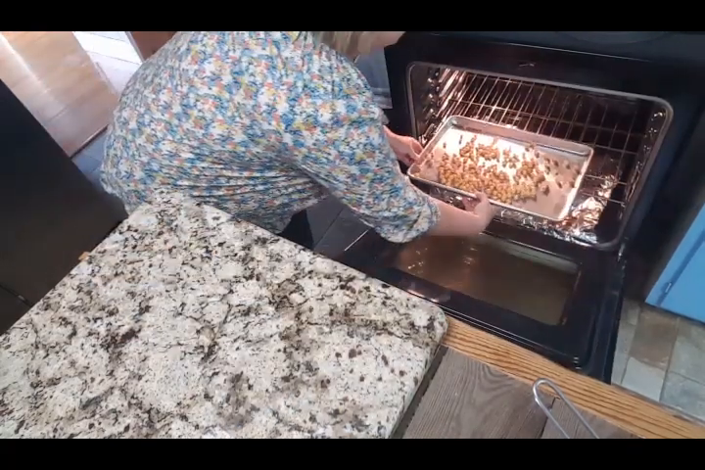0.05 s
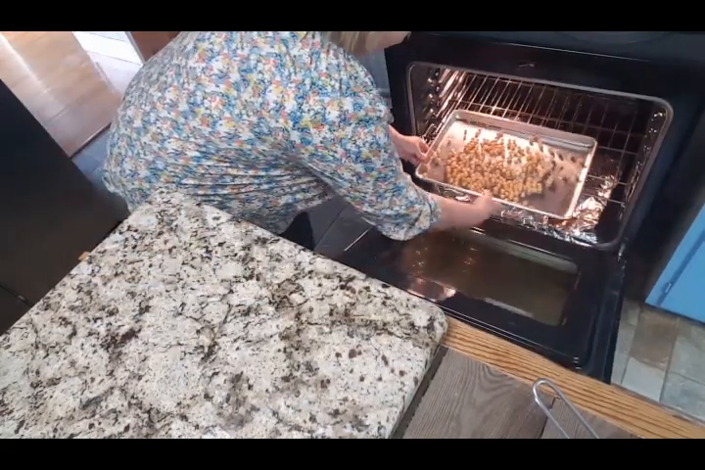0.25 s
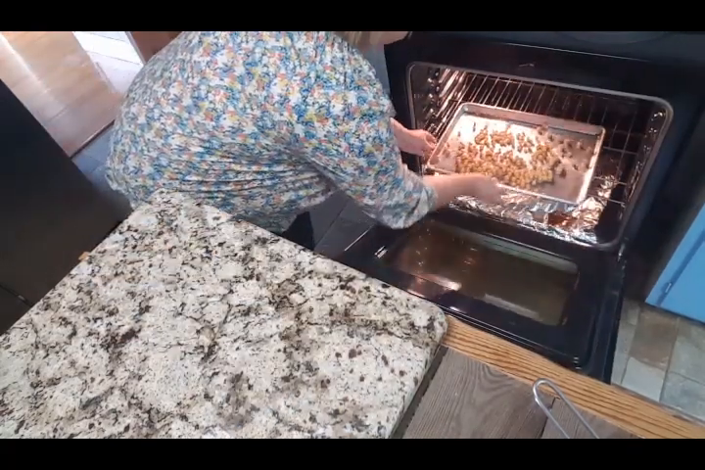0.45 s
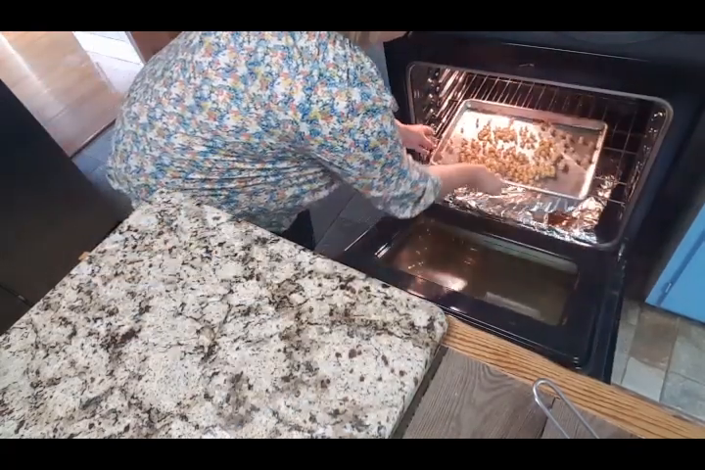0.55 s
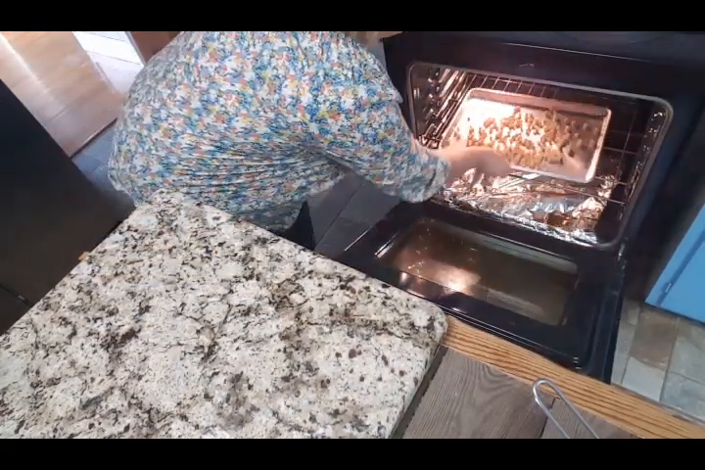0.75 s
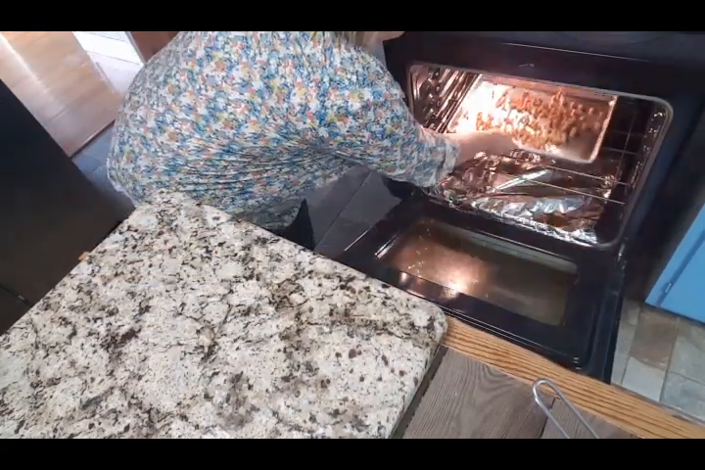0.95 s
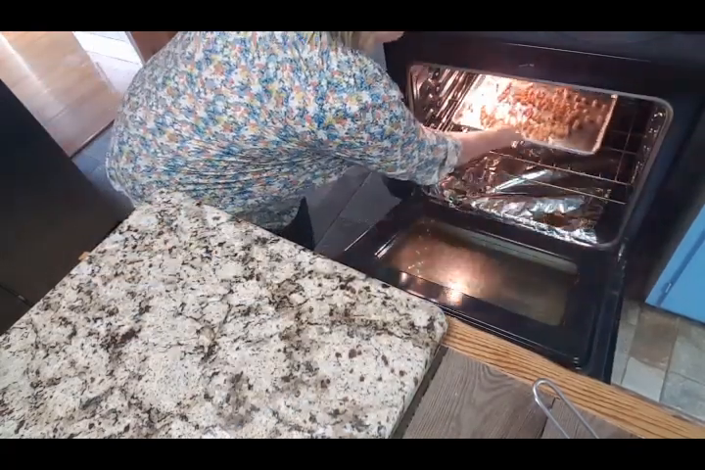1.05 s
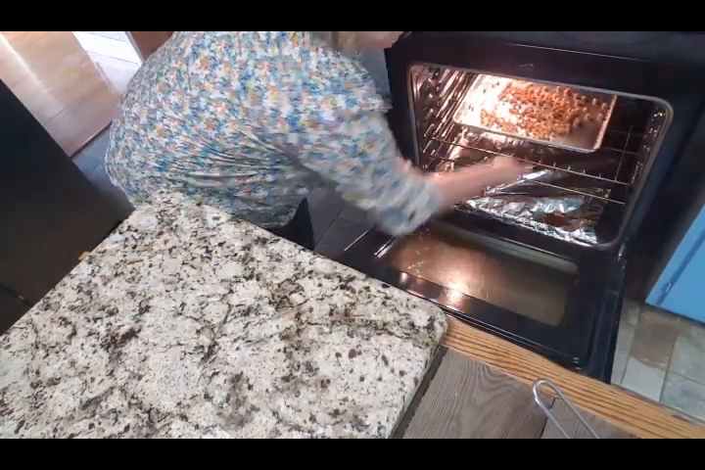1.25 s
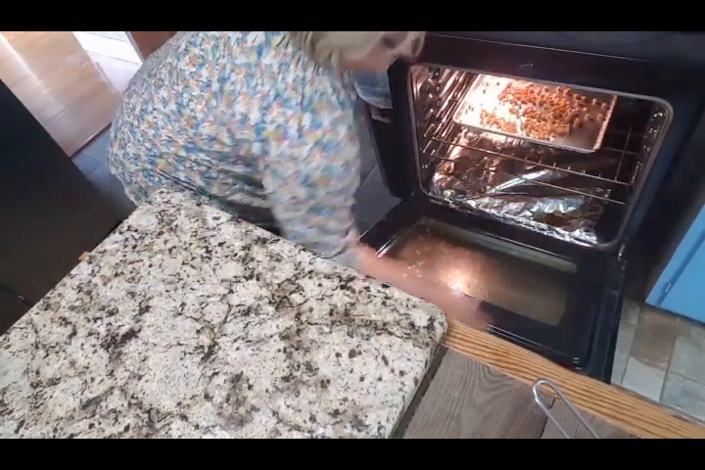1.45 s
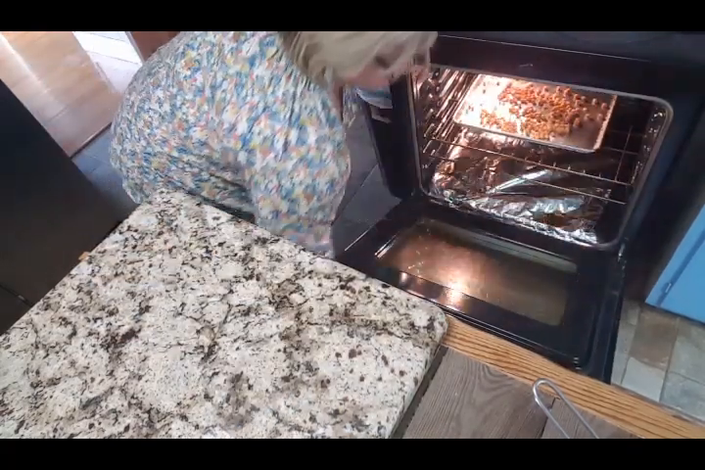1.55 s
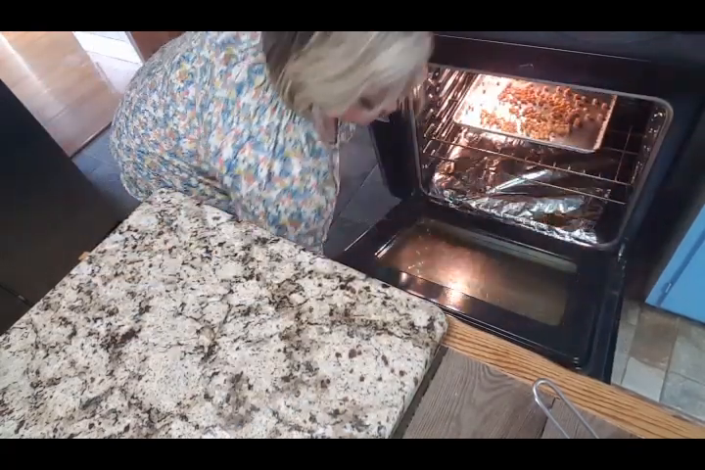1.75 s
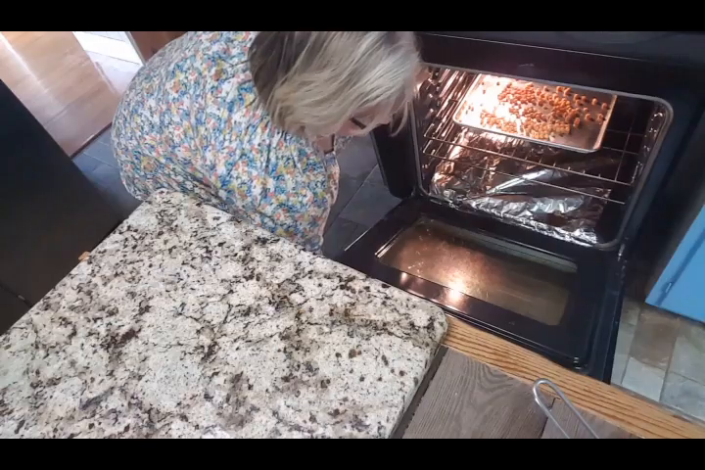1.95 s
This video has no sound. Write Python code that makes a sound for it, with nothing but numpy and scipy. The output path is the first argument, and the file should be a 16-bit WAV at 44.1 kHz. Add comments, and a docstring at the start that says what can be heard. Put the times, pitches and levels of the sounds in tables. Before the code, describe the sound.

A metal sheet pan lands on a wire oven rack at about 0.2 seconds, clattering and ringing in quick hits until 0.8. It scrapes softly, then is shoved in with a second rattle from 1.2 to 1.4 seconds. From about 1.5 seconds, light knocks on the oven door leave a faint metallic ring, with a soft rustle of sleeve and foil over low kitchen room tone.

```python
"""In a kitchen, a loaded metal sheet pan lands on a wire oven rack, clatters, slides and is shoved home.
Each contact cracks, sets off the dense shimmer of pan and rack, and rings the sheet's low modes and
the wires; the rim chatters as it catches and slips. Then a hand takes the open oven door: light knocks
and a faint metallic ring. A soft rustle of sleeve and foil and a low room tone sit underneath."""
import sys
import numpy as np
from scipy import signal
from scipy.fft import rfft, irfft, next_fast_len
from scipy.io import wavfile
from scipy.ndimage import map_coordinates

SR = 44100
rng = np.random.default_rng(int(sys.argv[2]) if len(sys.argv) > 2 else 0)


def transcribe(u):
    """Save the signal u as a 16-bit wav file named by the first command-line argument.

    u: samples, shape (n,) or (channels, n), limited to [-1, 1]; the rate is SR.
    q: integer samples, one column per channel.
    """
    v = np.clip(np.atleast_2d(u).T, -1, 1)
    q = np.round(v * 32767).astype(np.int16)
    wavfile.write(sys.argv[1], SR, q)


N = 88200


# Hits of the pan on the rack: start_s, thud_db, bass_db, middle_db, treble_db
PAN_HITS = [(0.2117, -32.5, -34.5, -24.5, -18), (.24, -30, -31, -24.5, -35),
            (.296, -32.5, -30.5, -23.5, -28), (.395, -36, -30.5, -30, -62),
            (0.4514, -34, -31.5, -23.5, -19.5), (.476, -33, -35, -24.5, -31),
            (.497, -28.5, -32, -22.5, -30), (.514, -32.5, -32, -23, -21.5), (0.595, -40, -30.5, -33.5, -31),
            (.645, -30, -27, -20.5, -24.5), (.673, -42, -25, -34.5, -57), (.806, -43, -37.5, -40.5, -39),
            (.845, -43, -35.5, -52, -63), (1.1192, -66, -49.5, -48, -45.5),
            (1.1847, -34.5, -31, -28, -27.5), (1.237, -37.5, -34, -26.5, -29.5),
            (1.283, -35, -36.5, -29, -31), (1.352, -35, -35.5, -36, -37)]
# Body of the pan, its low modes: pitch_hz, level_db, t60_s
PAN_MODES = [(141.2, -4.5, 0.69), (157.3, -5, 0.64), (221.4, 0, 0.62), (272.6, -4.5, 0.89), (283.1, -6, 1),
             (327.7, -11, 1), (397.6, -10, 0.93), (424.3, -12, 0.92), (484.6, -2, 0.43), (575, -8, 0.39),
             (678, -7.5, 0.3), (870, -9, .45), (1097, -14, 0.44), (1227, -11, 0.56), (1290, -13, 0.49)]
# Clang of the rack's wires: pitch_hz, level_db, t60_s
WIRE_MODES = [(1690, -7, .6), (1943, -3, .5), (2042, -3, .55), (2264, -1, .25), (2416, 0, .6),
              (2696, -2, .6), (3341, 0, .25), (3483, 0, .35), (4592, -6, .3), (5297, -2, .4),
              (6720, -6, .45), (7705, -4, .45)]
def pan_on_rack():
    """Each hit clatters and rings the sheet and the wires, as far as its force reaches their modes."""
    out = clatter(PAN_HITS)
    for start_s, *bands_db in PAN_HITS:
        body = [(hz, db + force_db(bands_db, hz), t60) for hz, db, t60 in PAN_MODES]
        clang = [(hz, db + force_db(bands_db, hz), t60) for hz, db, t60 in WIRE_MODES]
        add(out, start_s, amp(-8.5) * ring(body, rise_s=0.0053, skew_rad=0.28))
        add(out, start_s, amp(-19) * ring(clang, rise_s=0.001, skew_rad=1.22))
    return out


# Tone of the metal's shimmer: freq_hz, level_db
SHIMMER_TONE = [(25, -35), (45, -28), (65, -13), (105, -13), (145, -3.5), (185, -5), (220, -3), (280, -6),
                (350, -7), (490, -6), (540, -12.5), (730, -12.5), (870, -9.5), (1000, -13), (2500, -10),
                (5400, -16.5), (7500, -16.5), (8100, -12.5), (8800, -14), (9600, -19), (14400, -22.5)]
def clatter(hits):
    """Each contact cracks and leaves a shimmer of countless close modes; its bass builds in the oven."""
    out, t = np.zeros((2, N)), np.arange(SR) / SR
    attack_s, swell_s, crossover_hz = 0.00022, 0.004, 444
    attack, swell = 1 - np.exp(-t / attack_s), 1 - np.exp(-t / swell_s)
    grid_hz, patch_width_hz = np.arange(0, SR // 2, 10), 69.55
    for start_s, *bands_db in hits:
        # Every contact favours other groups of modes, mostly above the bass.
        patches_db = 3 * wobble(grid_hz / patch_width_hz) * grid_hz / (grid_hz + 970)
        hit_eq = lambda hz: amp(force_db(bands_db, hz) + np.interp(hz, grid_hz, patches_db))
        shimmer = die_away(filtered(noise(SHIMMER_TONE, size=len(t)), hit_eq))
        bass = filtered(shimmer, lambda hz: 1 / (1 + (hz / crossover_hz) ** 4))
        add(out, start_s, attack * (shimmer - bass) + swell * bass)
        treble_db = bands_db[-1]
        add(out, start_s, amp(treble_db - 4.5) * crack())
    return out


# Tail of the clatter in oven and kitchen: freq_hz, t60_s
CLATTER_TAIL = [(80, 0.57), (260, 0.95), (700, 0.78), (2200, .58), (5000, .48), (8500, 0.42), (13000, 0.47)]
def die_away(x):
    """Each frequency fades at its own speed."""
    hz, t, spectrum = signal.stft(x, SR, nperseg=256)
    fade = 1000 ** (-t / along(CLATTER_TAIL, hz)[:, None])
    return signal.istft(spectrum * fade, SR, nperseg=256)[1][:, :x.shape[1]]


def crack(centre_hz=5960, decay_s=0.009):
    """The dry, bright click of metal meeting metal."""
    t = np.arange(SR // 10) / SR
    white = rng.standard_normal((1, len(t)))
    burst = filtered(white, lambda hz: hz * centre_hz / (hz ** 2 + centre_hz ** 2))
    return unit(burst) * np.exp(-t / decay_s)


def force_db(bands_db, hz):
    """How hard a contact drives each frequency."""
    thud, bass, middle, treble = bands_db
    return along([(153, thud), (241, bass), (406, bass), (970, middle), (2320, middle), (5370, treble)], hz)


def ring(modes, rise_s, skew_rad, scatter_db=1.5):
    """Damped modes, each a little uneven in strength and out of step between left and right."""
    t, out = np.arange(N) / SR, np.zeros((2, N))
    draws, turns = rng.standard_normal((len(modes), 2)), rng.random(len(modes))
    for (hz, db, t60), (strength, skew), turn in zip(modes, draws, turns):
        phase = 2 * np.pi * turn + skew_rad * skew * np.array([[.5], [-.5]])
        fade = amp(db + scatter_db * strength) * 1000 ** (-t / t60)
        out += fade * np.sin(2 * np.pi * hz * t + phase)
    return np.sqrt(2) * out * (1 - np.exp(-t / rise_s))


# Envelope of the rim sliding on the wires: time_s, level_db
SLIDE_ENVELOPE = [(.2, -91), (.23, -37), (.4, -49.5), (.52, -33), (.77, -48.5), (.94, -42.5), (1.03, -45),
                  (1.17, -47), (1.2, -31.5), (1.3, -32), (1.38, -31), (1.46, -52), (1.55, -82)]
# Tone of the scrape: freq_hz, level_db
SCRAPE_TONE = [(30, -22), (70, -8.5), (150, 2.5), (235, -15), (280, 7.5), (330, 1.5), (365, 2.5),
               (410, 10.5), (470, -6), (600, 0), (2400, -2.5), (5500, -8), (7400, -6.5), (8500, -1.5),
               (9800, -11.5), (14000, -7.5)]
def rim_slide(slips_per_s=2500, scatter_db=1.5, wet_db=-2):
    """The rim catches and slips on the wires in tiny uneven jerks, with a wash of echo from the oven."""
    slips = (rng.random(N) < slips_per_s / SR) * amp(scatter_db * rng.standard_normal(N))
    direct = spread(slips * rng.standard_normal((2, N)), SCRAPE_TONE)
    wash = amp(wet_db) * noise(SCRAPE_TONE)
    return level(SLIDE_ENVELOPE) * unit(direct + wash)


# Light knocks on the door: start_s, thud_db, bass_db, middle_db, treble_db
DOOR_KNOCKS = [(1.5363, -46, -70, -54, -51), (1.6, -68, -79, -50.5, -54), (1.82, -78, -56.5, -62, -69)]
# Faint ring of the door's metal: pitch_hz, level_db, t60_s
DOOR_MODES = [(305, -57.5, 1.77), (420, -57.5, 1.3), (800, -76, 3.4), (888, -59, 0.45), (1150, -61, 1.54),
              (1630, -63.5, 1.8), (2760, -65, 0.99)]
def oven_door(ring_start_s=1.585, waver_db=1, wavers_per_s=12):
    """A hand grips the door: soft knocks and a thin, wavering ring."""
    out = clatter(DOOR_KNOCKS)
    for mode in DOOR_MODES:
        waver = amp(waver_db * wobble(np.arange(N) / SR * wavers_per_s))
        add(out, ring_start_s, waver * ring([mode], rise_s=0.0067, skew_rad=0.28))
    return out


# Envelope of the rustle: time_s, level_db
RUSTLE_ENVELOPE = [(1.1, -100), (1.5, -53.5), (1.62, -58), (1.75, -61), (2, -62.5)]
# Tone of the rustle: freq_hz, level_db
RUSTLE_TONE = [(120, -34), (300, -18), (550, -32), (860, -8.5), (1200, -21), (2700, -11.5), (5500, -16.5),
               (8500, -12.5), (10000, -19), (14000, -18.5)]
def rustle():
    """Sleeve and foil brush softly, swelling as the hand reaches the door."""
    return level(RUSTLE_ENVELOPE) * noise(RUSTLE_TONE)


# Tone of the kitchen's background: freq_hz, level_db
ROOM_TONE = [(25, 0), (50, -8), (90, -7), (160, -3), (210, -1.5), (250, -15), (350, -3), (550, -15.5),
             (1500, -16), (2700, -16.5), (5000, -25.5), (8500, -24.5), (14000, -27)]
def room_tone():
    """A quiet, steady bed of bass-heavy noise."""
    return amp(-68.5) * noise(ROOM_TONE)


# Stereo width, narrower as likeness nears 1: freq_hz, left_right_likeness
STEREO_LIKENESS = [(40, .6), (80, 0.4), (135, 1.5), (290, 0.6), (630, 0.93), (1400, 0.24), (4000, .15),
                   (14000, -0.25)]
def spread(pair, tone):
    """Two unrelated signals become coloured stereo of rms 1, narrow in the lows and wide on top."""
    def mid_side_gains(hz):
        angle = np.arccos(np.clip(along(STEREO_LIKENESS, hz), -1, 1)) / 2
        return amp(along(tone, hz)) * [np.cos(angle), np.sin(angle)]
    mid, side = filtered(pair, mid_side_gains)
    return unit(np.array([mid + side, mid - side]))


# Stereo balance: freq_hz, left_over_right_db
BALANCE = [(60, 4), (110, -0.5), (200, 1.5), (370, -0.5), (680, 3), (1260, 2), (2310, 3), (4240, 0),
           (7800, 3.0), (14300, 2)]
def lean_left(x, lead_s=0.0001992):
    """The sound reaches the left side a little earlier and, in most bands, louder."""
    sides = np.array([[.5], [-.5]])
    return filtered(x, lambda hz: amp(sides * along(BALANCE, hz)) * np.exp(2j * np.pi * hz * lead_s * sides))


def noise(tone, size=N):
    """Coloured stereo noise of rms 1."""
    return spread(rng.standard_normal((2, size)), tone)


def wobble(at):
    """A smooth random curve with one knot per unit of at."""
    return map_coordinates(rng.standard_normal(4096), [at], mode="wrap")


def amp(db):
    return 10 ** (np.asarray(db) / 20)


def unit(x):
    return x / np.sqrt(np.mean(x ** 2) + 1e-20)


def along(points, hz):
    """Read (freq_hz, value) points on a log frequency axis."""
    freqs, values = np.transpose(points)
    return np.interp(np.log(hz + 1), np.log(freqs + 1), values)


def level(envelope):
    """Gain per sample from (time_s, level_db) rows."""
    return amp(np.interp(np.arange(N) / SR, *np.transpose(envelope)))


def filtered(x, response):
    """Shape x with a frequency response."""
    size = x.shape[-1]
    padded = next_fast_len(size + SR // 10, real=True)
    return irfft(rfft(x, padded) * response(np.fft.rfftfreq(padded, 1 / SR)), padded)[..., :size]


def add(track, start_s, sound):
    """Mix a sound in from start_s."""
    part = track[:, int(round(start_s * SR)):][:, :sound.shape[-1]]
    part += sound[:, :part.shape[1]]


def scene():
    """Pan, door, rustle and room, heard from a little to the right of the oven."""
    return lean_left(pan_on_rack() + rim_slide() + oven_door() + rustle() + room_tone())


def record(dry):
    """A steep high cut takes off the top air."""
    cutoff_hz, edge_hz = 14650, 200
    return filtered(dry, lambda hz: np.clip((cutoff_hz - hz) / edge_hz + .5, 0, 1))


dry = scene()
out = record(dry)
transcribe(out)
```